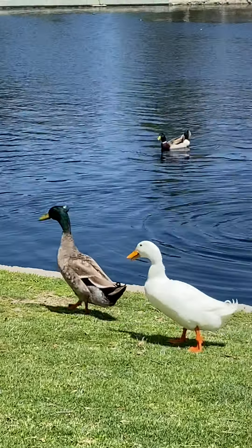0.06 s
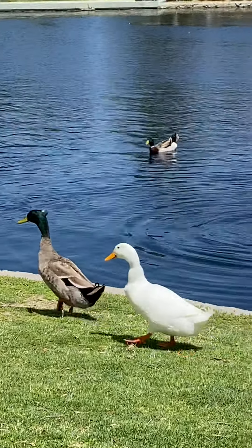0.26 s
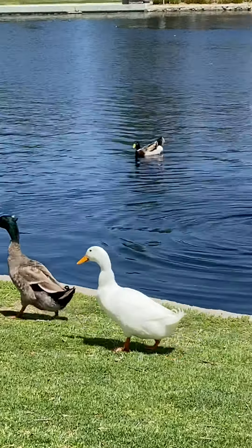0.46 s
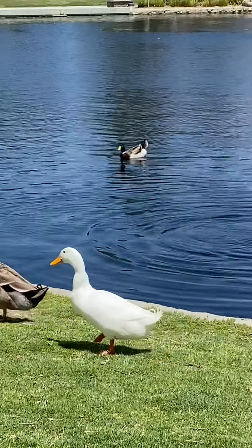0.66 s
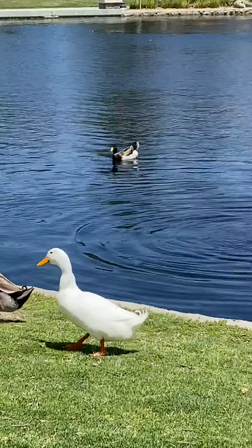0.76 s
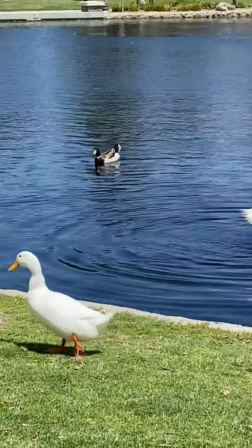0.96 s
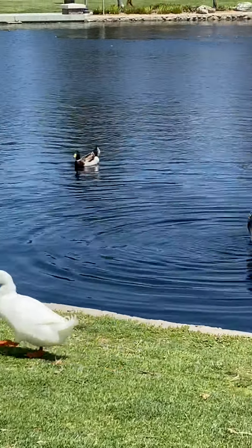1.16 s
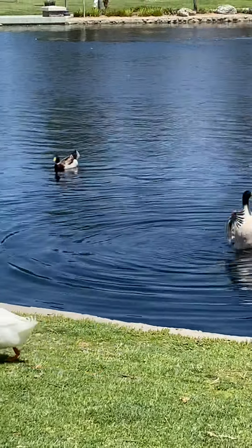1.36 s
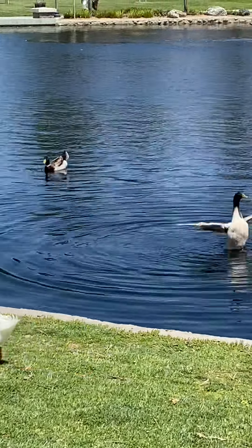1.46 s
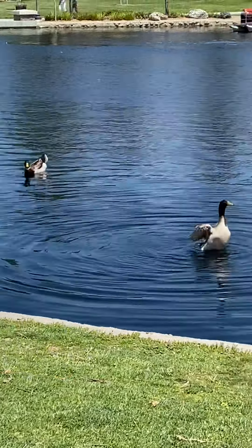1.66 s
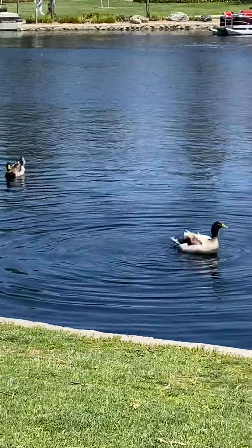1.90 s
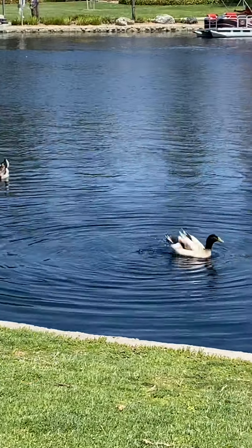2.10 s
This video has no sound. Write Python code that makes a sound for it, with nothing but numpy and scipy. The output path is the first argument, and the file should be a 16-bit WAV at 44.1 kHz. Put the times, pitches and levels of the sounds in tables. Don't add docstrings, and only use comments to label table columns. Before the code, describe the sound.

Short, quiet duck quacks outdoors, thin and raspy at first, joined in the second half by closer, croaky grunts and one tiny bill click, with low wind rumble and knocks on a handheld microphone and far hiss.

```python
import sys
import numpy as np
from scipy import signal
from scipy.fft import rfft, irfft, next_fast_len
from scipy.io import wavfile
from scipy.ndimage import uniform_filter1d

SR = 44100
rng = np.random.default_rng(int(sys.argv[2]) if len(sys.argv) > 2 else 0)


def volts_from_decibels(level):
    exponent = np.asarray(level, float) / 20
    return 10 ** exponent


def generate_wav(sig):
    pcm = np.round(np.clip(np.atleast_2d(sig).T, -1, 1) * 32767).astype(np.int16)
    wavfile.write(sys.argv[1], SR, pcm)


N = 94153

# start [t/s], length [t/s], level/dB, main throat resonance at start and end [f/Hz]
RASPS = [
    (.032, .083, -48, 1790, 1860),
    (.53, .03, -52, 2200, 2200),
    (.565, .065, -50, 1750, 1830),
    (.783, .03, -52, 2250, 2050),
    (.808, .058, -51.5, 1830, 1850),
    (1.283, .06, -53.5, 1850, 1750),
    (1.497, .078, -46.5, 1800, 1990),
    (1.778, .035, -55, 1800, 1900),
    (1.878, .025, -56, 1850, 1900),
    (1.93, .065, -55, 1650, 1900),
]
# ratio to main resonance, width [f/Hz], level/dB
DRAKE_THROAT = [(.83, 90, -3.5), (1.0, 75, 0), (1.2, 85, -2.5), (1.44, 110, -10.5), (2.87, 450, -15)]
# start [t/s], length [t/s], level/dB, pulse rate [f/Hz], brightness [level/dB]
GRUNTS = [
    (.97, 0.022, -49, 216, -9.5),
    (1.132, .075, -44, 210, -14.5),
    (1.22, 0.045, -48.5, 330, -15),
    (1.41, 0.062, -43, 210, -7.5),
    (1.651, 0.044, -48, 180, -10),
    (1.732, 0.048, -43.5, 206, 5),
    (1.835, 0.048, -44.5, 170, -3.5),
]
# centre [f/Hz], width [f/Hz], level/dB, peak position [share of grunt]
DUCK_THROAT = [(420, 200, -3, .55), (850, 300, 0, .55), (1450, 300, 0, .75), (2200, 700, -7, .85),
               (4100, 900, -8, .45), (5300, 1000, -6, .4)]
# start [t/s], peak level/dB, centre [f/Hz], width [f/Hz]
TICK = (1.212, -37, 3000, 1300)
# t/s, level/dB
GUST = [(0.0, -56), (0.08, -50), (0.15, -44), (0.19, -54), (0.26, -44), (0.37, -53.5), (1.0, -48),
        (1.03, -40), (1.18, -45.5), (1.26, -45), (1.27, -45.5), (1.48, -39.5), (1.58, -50), (1.68, -34.5),
        (1.82, -46), (1.92, -39.5), (2.06, -56.5), (2.13, -43.5)]
# f/Hz, level/dB per Hz
WIND = [(22, -35), (35, -40), (55, 5), (80, 3.5), (150, -5), (240, -7.5), (400, -26.5), (800, -26.5)]
# centre [t/s], length [t/s], level/dB, right-port gain (the left has -1)
EDDIES = [
    (0.096, .05, -51, 0.68),
    (.22, 0.035, -54, 0.7),
    (0.937, .09, -49.5, 1),
    (1.333, 0.073, -50.5, 1),
    (1.422, 0.054, -46.5, 1),
    (1.67, 0.056, -58, 1),
    (1.95, 0.022, -59, 1),
    (2.032, 0.13, -48.5, 0.88),
]
# start [t/s], length [t/s], level/dB, start pitch [f/Hz], end pitch [f/Hz]
BUFFETS = [
    (0.089, .05, -48.5, 260, 198),
    (0.136, 0.048, -51, 150, 100),
    (.91, 0.057, -42.5, 109, 80),
    (1.2, .04, -37, 188, 130),
    (1.237, 0.055, -36.5, 84, 65),
    (1.658, .045, -29, 230, 105),
    (1.715, 0.044, -43, 165, 129),
    (1.895, 0.041, -35.5, 139.4, 55.7),
]
# f/Hz, level/dB per Hz
HISS = [(150, 0.5), (300, -5), (500, -4.5), (1000, -3.5), (2000, -6.5), (4000, -14), (9000, -15.5),
        (16000, -44)]
# f/Hz, level/dB
LEAN = [(100, 7), (290, -4), (640, -7), (1300, -9.5), (1900, 0.5), (2600, -2.5), (3200, 0), (15000, 0)]
# f/Hz, phase [radians]
LEAD = [(1120, -.3), (3900, 0), (5200, .6), (7000, 2.95), (7900, 3.38), (9950, 6.28), (13700, 9.42),
        (15900, 12.3)]
# f/Hz, level/dB
APART = [(100, 3), (300, -13.5), (700, -9), (2000, -16), (3200, -17.5), (15000, -17.5)]


def rms_one(x):
    return x / np.sqrt(np.mean(x ** 2) + 1e-20)


def at_hz(points, hz):
    curve_hz, value = np.transpose(points)
    return np.interp(np.log(hz + 1), np.log(curve_hz), value)


def drift(rate):
    r = np.exp(-80 * np.pi * rate / SR)
    chance = rng.standard_normal(N // 40 + 2002)
    slow = signal.lfilter([1], [1, -2 * r, r * r], chance)[2000:]
    return np.interp(np.arange(N) / 40, np.arange(len(slow)), rms_one(slow))


def resonate(x, hz, width_hz):
    r = np.exp(-np.pi * width_hz / SR)
    poles = [1, -2 * r * np.cos(2 * np.pi * hz / SR), r * r]
    return signal.lfilter([(1 - r * r) / 2, 0, (r * r - 1) / 2], poles, x)


def band_pass(x, low_hz, high_hz):
    return signal.sosfilt(signal.butter(2, [low_hz, high_hz], "band", fs=SR, output="sos"), x)


def swell(size, rise):
    u = np.arange(size) / size
    rise = np.clip(rise, .1, .9)
    return np.sin(np.pi / 2 * np.minimum(u / rise, (1 - u) / (1 - rise)))


def add(out, s, piece):
    i = int(s * SR)
    out[..., i:i + piece.shape[-1]] += piece[..., :N - i]


def pulses(size, hz, jitter, chance):
    at = np.cumsum(np.r_[0, SR / hz * (1 + jitter * chance)]).astype(int)
    return at[at < size]


def banded(spectrum, patchy_db, rate, channels):
    out = 0
    together = drift(rate / 3)
    edges = 16 * 2 ** np.arange(0, 10.4, .5)
    white = rng.standard_normal((2, channels, N + SR // 2))
    for k, (low, high) in enumerate(zip(edges, edges[1:])):
        hz = np.sqrt(low * high)
        if spectrum[0][0] / 1.3 < hz < spectrum[-1][0] * 1.3:
            band = band_pass(white[k % 2], low, high)[:, -N:]
            flicker_db = patchy_db * (0.71 * together + drift(rate))
            out = out + band * volts_from_decibels(at_hz(spectrum, hz) + flicker_db)
    return rms_one(out)


def drake():
    pulse_hz, jitter, breath, evenness = 285, .2, .6, .6
    throb_hz, throb_db = 83, 4.0
    full_call_s = .08
    out = np.zeros(N)
    for s, length, level_db, from_hz, to_hz in RASPS:
        size = int(length * SR)
        chance = rng.standard_normal((2, 60))
        air = rng.standard_normal(size)
        source = np.zeros(size)
        at = pulses(size, pulse_hz, jitter, np.clip(chance[0], -2, 2))
        source[at] = volts_from_decibels(2.5 * chance[1, :len(at)])
        puffs = .3 + signal.lfilter([1], [1, -.985], source)
        source = 8 * source + breath * air * puffs

        turns = np.cumsum(np.linspace(from_hz, to_hz, size)) / SR
        call = 0
        for ratio, width_hz, db in DRAKE_THROAT:
            carrier = np.exp(2j * np.pi * ratio * turns)
            r = np.exp(-2 * np.pi * width_hz / SR)
            ring = (carrier * signal.lfilter([1], [1, -2 * r, r * r], source / carrier)).real
            call = call + volts_from_decibels(db * full_call_s / length) * rms_one(ring)

        call = call / (uniform_filter1d(call ** 2, 260) + .05) ** (evenness / 2)
        throb = volts_from_decibels(throb_db * np.sin(2 * np.pi * throb_hz * np.arange(size) / SR))
        add(out, s, volts_from_decibels(level_db) * rms_one(call * swell(size, .58) ** .7 * throb))
    return out


def duck():
    out = np.zeros(N)
    for s, length, level_db, hz, bright_db in GRUNTS:
        size = int(length * SR)
        chance = rng.standard_normal((2, 30))
        dull_db = -min(bright_db, 0)
        at = pulses(size, hz, .015 + .025 * dull_db, np.clip(chance[0], -2, 2))
        source = (.025 + .009 * dull_db) * rng.standard_normal(size)
        source[at] += volts_from_decibels(1.5 * chance[1, :len(at)])

        call = 0
        for k, (f, width_hz, db, rise) in enumerate(DUCK_THROAT):
            push = np.r_[source * swell(size, rise) ** 1.5, np.zeros(400)]
            gain = volts_from_decibels(db - dull_db * min(f / 3000, 1))
            call = call + (-1) ** k * gain * rms_one(resonate(push, f, width_hz))
        add(out, s, volts_from_decibels(level_db) * call / 2)
    return out


def tick():
    s, peak_db, hz, width_hz = TICK
    out = np.zeros(N)
    click = resonate(np.r_[1., np.zeros(400)], hz, width_hz)
    click = resonate(click, hz, width_hz)
    add(out, s, volts_from_decibels(peak_db) * click / np.abs(click).max())
    return out


def rumble():
    s, db = np.transpose(GUST)
    both, own = banded(WIND, 0.5, 19.7, channels=2)
    strength = volts_from_decibels(np.interp(np.arange(N) / SR, s, db))
    return strength * (both + volts_from_decibels(-21.5) * own * np.array([[1], [-1]]))


def eddies():
    out = np.zeros((2, N))
    lumps = rms_one(band_pass(rng.standard_normal(N), 70, 260))
    for s, length, level_db, side in EDDIES:
        i = int(max(s - length, 0) * SR)
        size = int(2 * length * SR)
        shape = swell(size, 0.44)[:N - i] ** 2
        add(out, i / SR, volts_from_decibels(level_db) * shape * lumps[i:i + size] * np.array([[-1.], [side]]))
    return out


def buffets():
    out = np.zeros((2, N))
    for s, length, level_db, start_hz, end_hz in BUFFETS:
        size = int(length * SR)
        turns = np.cumsum(np.geomspace(start_hz, end_hz, size)) / SR
        thud = swell(size, 0.15) ** 2 * np.sin(2 * np.pi * turns)
        add(out, s, volts_from_decibels(level_db) * thud * np.ones((2, 1)))
    return out


def far_hiss():
    return volts_from_decibels(-52) * banded(HISS, .45, 16.8, channels=2)


def ports(near, apart):
    size = next_fast_len(N + 4096)
    hz = np.arange(size // 2 + 1) * SR / size
    half = volts_from_decibels(at_hz(LEAN, hz) / 2) * np.exp(.5j * at_hz(LEAD, hz))
    shared = rfft(np.r_[near, near[:-2048:-1]], size)
    unrelated = rfft(apart, size) * volts_from_decibels(at_hz(APART, hz))
    left, right = (shared + unrelated) * half, (shared - unrelated) / half
    return irfft(np.array([left, right]), size)[:, :N]


def scene():
    birds = drake() + duck() + tick()
    lag = int(0.025 * SR)
    birds = birds + volts_from_decibels(-14.5) * np.r_[np.zeros(lag), birds[:-lag]]
    hiss, apart = far_hiss()
    return ports(birds + hiss, apart) + rumble() + eddies() + buffets()


def top_cut(x):
    return signal.sosfilt(signal.butter(12, 15910, fs=SR, output="sos"), x)


def record(dry):
    return top_cut(dry)


dry = scene()
out = record(dry)
generate_wav(out)
```